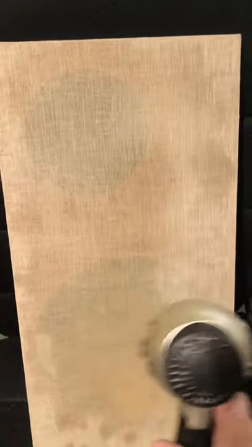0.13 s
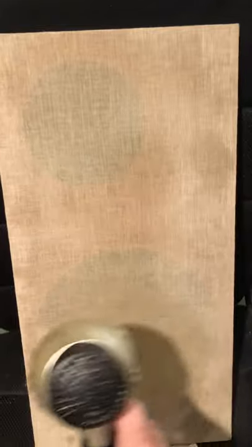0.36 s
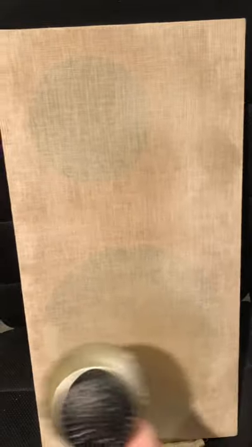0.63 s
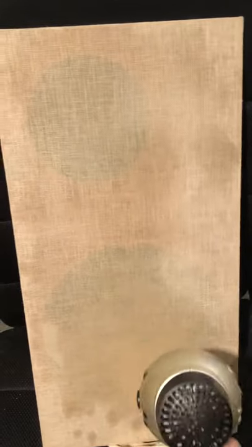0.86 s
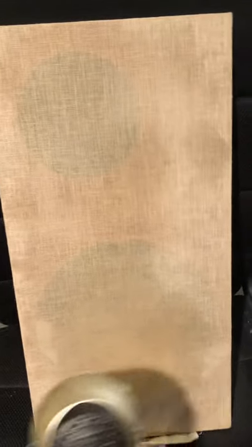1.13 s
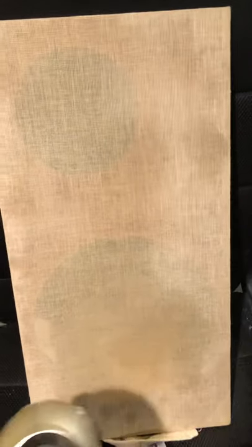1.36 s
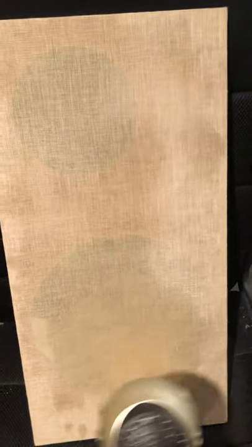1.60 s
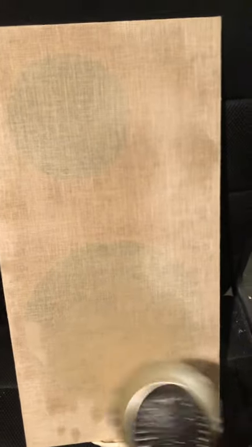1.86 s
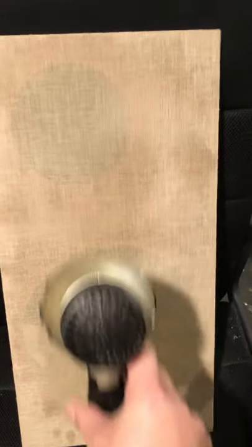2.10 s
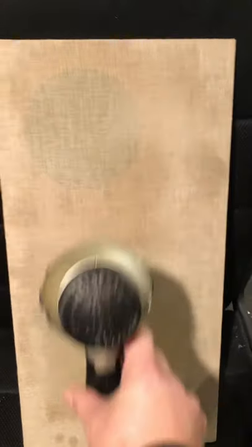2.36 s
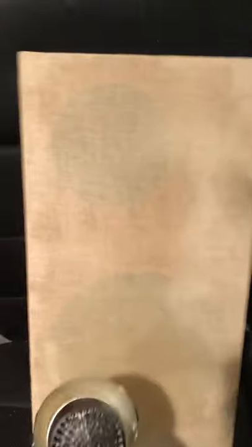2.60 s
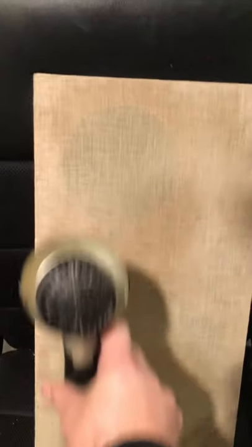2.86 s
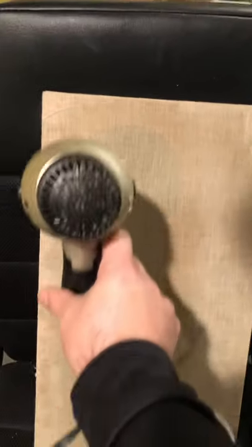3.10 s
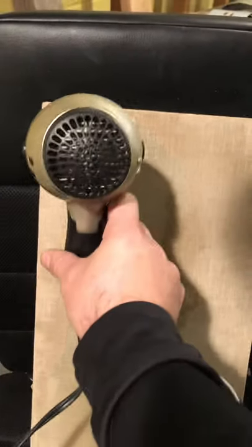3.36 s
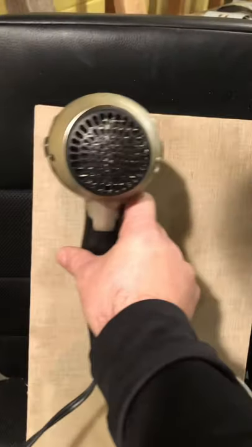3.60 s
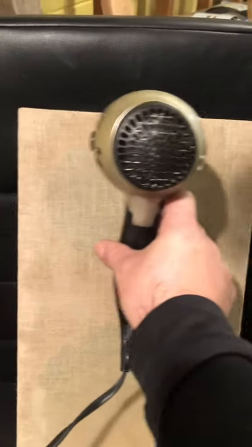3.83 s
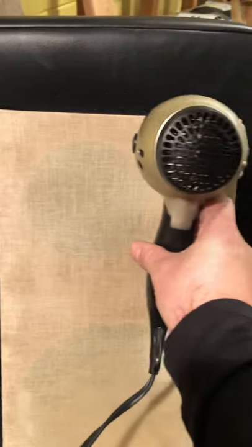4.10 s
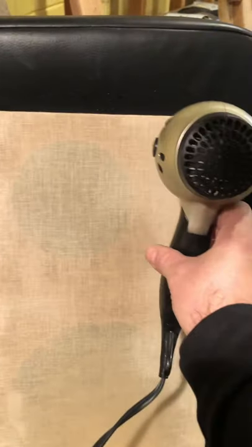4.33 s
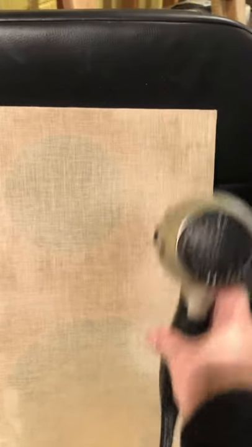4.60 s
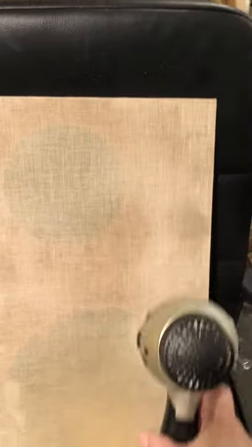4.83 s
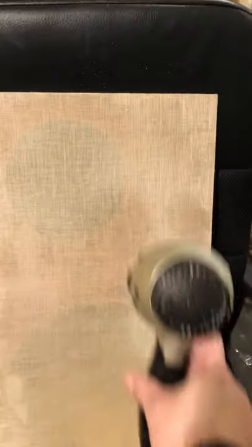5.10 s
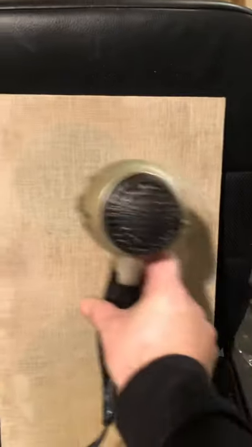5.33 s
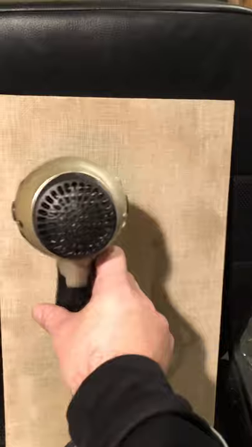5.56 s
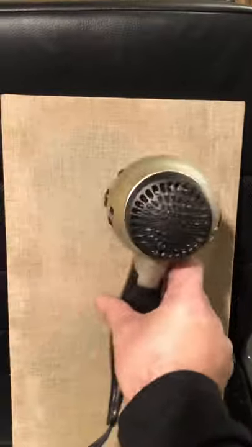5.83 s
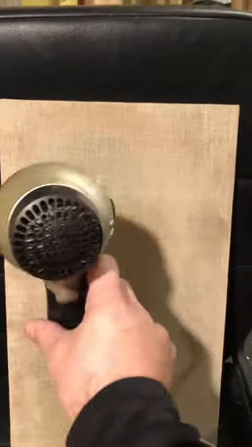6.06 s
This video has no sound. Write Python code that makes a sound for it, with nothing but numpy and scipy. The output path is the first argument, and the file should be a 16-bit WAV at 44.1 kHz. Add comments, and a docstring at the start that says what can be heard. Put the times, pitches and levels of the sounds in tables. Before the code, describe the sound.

A handheld hair dryer runs at full, steady speed for about 6.2 seconds, close to the microphone in a small indoor space with soft surfaces and a short, faint room tail. Dense, bright rushing air fills the mid and treble, with little bass and a crisp hiss that flickers slightly. The barrel adds hollow, whistling colour near 1.4 and 2.6 kHz. A thin whine near 4.1 kHz sags almost imperceptibly, with a weaker fan tone an octave below; both waver and briefly fade. From 0 to 1.9 s the dryer sweeps low over the cloth board, its colour gliding. Around 2 to 2.4 s it lifts and turns, shifting the resonance; after 2.9 s it reaches the upper board, with slightly more hiss. Quicker changes occur around 4.7 to 5.3 s, then it sweeps on, still blowing at the end.

```python
"""Hair dryer swept over a board

A handheld dryer, intake grille towards a microphone, is swept over a cloth-covered board indoors.
Filtered noise is the rushing air and rings the barrel's pipe modes; sines are a seven-blade fan's whine.
The board returns the noise about a millisecond late, so notches glide as the hand moves nearer and further."""
import sys
import numpy as np
from scipy import signal
from scipy.fft import rfft, irfft
from scipy.io import wavfile
from scipy.ndimage import uniform_filter1d, map_coordinates

SR = 44100
rng = np.random.default_rng(int(sys.argv[2]) if len(sys.argv) > 2 else 0)


def volts_from_decibels(level):
    """Turn decibel levels (scalar or array-like) into linear amplitude factors."""
    exponent = np.asarray(level, float) / 20
    return 10 ** exponent


def master(y):
    """Save y as 16-bit WAV."""
    cut = np.clip(np.atleast_2d(y).T, -1, 1)
    pcm = np.round(cut * 32767)  # scale
    wavfile.write(sys.argv[1], SR, pcm.astype(np.int16))


N = 273420
T = np.arange(N) / SR


def columns(table):
    """Every column after the time column, interpolated sample by sample."""
    seconds, *rest = np.transpose(table)
    return [np.interp(T, seconds, column) for column in rest]


def unit(x):
    """Scale to rms 1."""
    return x / np.sqrt(np.mean(x ** 2))


def coloured(spectrum):
    """Gaussian noise of rms 1 with the given spectrum, log-interpolated in frequency."""
    hz, db = np.transpose(spectrum)
    f = np.arange(N // 2 + 1) * SR / N + 1  # +1 keeps the log finite
    gain = volts_from_decibels(np.interp(np.log(f), np.log(hz), db, left=-80, right=-80))
    return unit(irfft(rfft(rng.standard_normal(N)) * gain, N))


def walk(rate_per_s):
    """Slow random curve of rms 1: noise averaged twice over 1/rate."""
    k = int(SR / rate_per_s)
    smooth = uniform_filter1d(rng.standard_normal(N), k)
    return unit(uniform_filter1d(smooth, k))


def step(at_s, takes_s):
    """Smooth move from 0 to 1."""
    return (1 + np.tanh((T - at_s) / takes_s)) / 2


def bump(at_s, half_s):
    """Bell shape with top 1."""
    return np.exp(-((T - at_s) / half_s) ** 2)


def peak_filter(x, hz, width_hz):
    """Resonant band-pass with gain 1 at its centre."""
    return signal.lfilter(*signal.iirpeak(hz, hz / width_hz, fs=SR), x)


def resonance(x, hz, width_hz, db):
    """One pipe mode, set to its level."""
    return volts_from_decibels(db) * unit(peak_filter(x, hz, width_hz))


def echo(x, lag_ms, share):
    """A copy of x that arrives after a fixed or moving lag."""
    return share * map_coordinates(x, [np.arange(N) - lag_ms * SR / 1000], order=3, mode="nearest")


# The hand's pose, a guess at three angles around the usual hold. Each row: time in seconds,
# lag of the board's echo in ms, grille facing the microphone, sideways lean, roll (angles about -1 to 1).
HAND_POSE = [(0, 1.1, -0.32, 0.27, 0.8), (.3, 1.15, -0.14, 0.55, .1), (.6, 1.18, -0.094, -0.24, -0.93),
             (.8, 1.06, -.8, 0.39, -0.14), (1.0, 1.17, -1.1, 0.61, -0.49), (1.4, 1.18, -.8, 0.51, 0.015),
             (1.7, 1.04, -0.67, 0.04, .1), (1.88, 1.11, -0.94, 0.39, .15), (1.97, 1.19, -0.085, 0.15, .8),
             (2.13, 1.38, 0.61, 0.97, 0.64), (2.36, 1.23, 0.71, 1.24, .3),
             (2.45, 1.08, -.2, -0.0048, 0.062), (2.6, 1.06, -0.28, -0.56, -0.12),
             (2.8, 1.21, 0.51, .45, -0.5), (3.0, 1.23, 0.45, -.1, 0.35), (3.2, 1.22, 1.3, -0.34, .1),
             (3.7, 1.2, .95, -0.51, -0.23), (3.9, 1.21, .55, -.35, -0.22), (4.3, 1.1, 0.84, -.35, .05),
             (4.7, 1.04, -.45, -0.45, 0.52), (4.95, .97, -0.65, -1.4, 0.91), (5.05, 1.12, -0.54, 0.35, -.3),
             (5.17, 1.17, 0.041, 0.24, -0.31), (5.3, 1.18, 0.69, -0.04, -0.31),
             (5.6, 1.21, 0.36, -0.042, -0.72), (5.85, 1.27, 1.1, 0.39, 0.73), (6.0, 1.33, 0.43, 0.93, 0.29),
             (6.2, 1.35, 1.1, 0.19, 0.27)]


def posed(rows):
    """One curve per row: usual value plus the effect of the pose and of the arm reaching the board's far half."""
    reached = step(at_s=2.9, takes_s=0.11)
    pose = np.array([np.ones(N), *columns(HAND_POSE)[1:], reached])
    return np.array(rows) @ pose


def room(x):
    """Diffuse reflections; the moving dryer slides between several paths, so the fine ripple keeps changing."""
    paths, level_db, t60_s, gap_s = 6, -11, .1, .004
    t = T[:SR // 4]
    shares = np.array([walk(1.6) for _ in range(paths)])
    shares = shares / np.sqrt(np.sum(shares ** 2, axis=0))
    out = 0
    for share in shares:
        tail = rng.standard_normal(len(t)) * np.exp(-np.log(1000) * t / t60_s) * (t > gap_s)
        out = out + share * signal.fftconvolve(x, tail / np.sqrt(np.sum(tail ** 2)))[:N]
    return volts_from_decibels(level_db) * out


def nearby_echo(noise):
    """An inverted echo while the dryer is held low."""
    return echo(noise, 2.5, -.11 * bump(at_s=1.3, half_s=.6))


def dulled(noise):
    """Cloth and upholstery absorb treble: first-order low-pass."""
    return signal.lfilter(*signal.butter(1, 4370, fs=SR), noise)


def seat_echo(soft_noise):
    """Echo off the seat under the board; its lag shortens as the dryer is lifted."""
    lifted = step(at_s=1.92, takes_s=0.36)
    lag_ms = np.interp(lifted, (0, 1), (2.45, 1.93))
    share = np.interp(lifted, (0, 1), (0.14, .11))
    return echo(soft_noise, lag_ms, share)


def board_echo(soft_noise):
    """Echo off the board, its lag following the hand; the share grows with the lag."""
    usual_lag_ms, usual_share, share_per_ms = 1.17, 0.21, 0.12
    lag_ms = columns(HAND_POSE)[0]
    return echo(soft_noise, lag_ms, usual_share + share_per_ms * (lag_ms - usual_lag_ms))


# Pitch of the 14th order: the motor sags slowly, the moving hand bends it up and down.
# Each row: time in seconds, pitch in Hz.
WHINE_HZ = [(0.0, 4103.5), (0.35, 4102.8), (0.7, 4107.8), (1.05, 4099.3), (1.35, 4104.8), (1.7, 4103.8),
            (2.4, 4097.3), (2.6, 4103.3), (2.75, 4105.5), (2.8, 4105.3), (2.95, 4099.5), (3.25, 4095.3),
            (3.5, 4097.5), (3.95, 4096.0), (4.15, 4098.3), (4.55, 4092.5), (4.75, 4094.0), (4.9, 4100.0),
            (5.0, 4101.5), (5.45, 4092.5), (5.7, 4094.5), (5.9, 4090.8), (6.05, 4097.8), (6.2, 4096.2)]
# Tones of the fan. Each entry: multiple of shaft speed.
SHAFT_ORDERS = (1, 4, 7, 14, 21, 28, 35, 49)
# Phase wander of each order. Each entry: rms in radians.
PHASE_WANDER_RAD = (.7, .9, .3, .15, .33, .33, .33, .33)
# How each order beams. Each row, one an order: usual rms level in dB, dB per unit of facing, of lean,
# of roll, dB once the arm has reached out.
FAN_BEAM_DB = [(-42.5, 0.5, .3, 1.5, -18), (-45, 2, -.3, -1, 6), (-32.8, 0, .2, 0.5, -1.5),
               (-28.5, 0.3, .2, -.2, -1), (-42.5, -6, -.3, .3, -10), (-53, .1, .1, -2, .1),
               (-44, 1.2, .4, 3, -2), (-51, .1, .1, .1, .1)]
# Moments when the 7th order grows quieter. Each row: centre in seconds, depth in dB, half-length in seconds.
ORDER_7_DIPS = [(.03, -11, 0.12), (.5, -8, 0.15), (.8, -6, .06), (1.53, -7, 0.2), (2.28, -8, .09),
                (2.76, -11, 0.082), (3.5, -9, .1), (3.8, -4, .2), (4.22, -13, .22), (4.82, -5, .12),
                (5.28, -7, .08), (5.68, -8, 0.13), (6.18, -7, .1)]
# Moments when the 14th order grows quieter. Each row: centre in seconds, depth in dB, half-length in seconds.
ORDER_14_DIPS = [(.1, -6, 0.14), (1.0, -12, .16), (1.88, -7, 0.15), (2.62, -5, .16), (3.08, -7, .09),
                 (4.28, -6, .15), (4.86, -8, .09), (5.82, -6.5, .17), (6.2, -5, 0.055)]


def fan():
    """Shaft and blade-pass tones (seven blades) on one phase, wavering in turbulent inflow, and mains hum."""
    shaft_hz = columns(WHINE_HZ)[0] / 14
    turn_rad = 2 * np.pi * np.cumsum(shaft_hz) / SR
    turn_rad = turn_rad + 0.004 * walk(10)  # the hand's tremor shifts the path, more radians for higher orders
    dips = {7: ORDER_7_DIPS, 14: ORDER_14_DIPS}
    out = volts_from_decibels(-57) * np.sin(2 * np.pi * 120 * T)  # hum
    for order, db, wander_rad in zip(SHAFT_ORDERS, posed(FAN_BEAM_DB), PHASE_WANDER_RAD):
        if order in dips:
            db = db + sum(depth_db * bump(at_s, half_s) for at_s, depth_db, half_s in dips[order])
        else:
            db = db + 1.5 * walk(8.1)  # the weaker orders come and go
        phase_rad = order * turn_rad + wander_rad * walk(47)
        out = out + volts_from_decibels(db + 1.3 * walk(27)) * np.sin(phase_rad)
    return np.sqrt(2) * out  # levels are rms


# Pipe modes: first and skirt, second and skirt, third, cross.
# Each row: centre in Hz, width in Hz, level in dB before beaming.
PIPE_MODES = [(1352, 67, 2), (1416, 330, -3.5), (2593, 42, 2.5), (2490, 560, -14), (3630, 430, 1.5),
              (8540, 220, 5.5)]
# How the modes beam: first, its skirt relative to it, second, third, cross. Each row: usual gain in dB,
# dB per unit of facing, of lean, of roll, dB once the arm has reached out.
BARREL_BEAM_DB = [(-30.5, 4, -2.4, 3, -0.67), (1.2, -2.5, 6.8, -6, 1.1), (-34.5, 0.2, 7.5, -3.5, 0.06),
                  (-28, 2, -0.8, -3.5, -0.49), (-41.5, 2.5, -1.5, 4, .2)]


def barrel():
    """Turbulence rings the barrel; the two lower modes are a sharp peak on a wide skirt."""
    eddies = rng.standard_normal(N)
    peak_1, skirt_1, peak_2, skirt_2, mode_3, cross = (resonance(eddies, *mode) for mode in PIPE_MODES)
    first, skirt, second, third, across = volts_from_decibels(posed(BARREL_BEAM_DB))
    low = first * (peak_1 + skirt * skirt_1) + second * (peak_2 + skirt_2)
    return low + third * mode_3 + across * cross


# Hollows between the barrel's modes. Each row: centre in Hz, width in Hz.
HOLLOWS_HZ = [(1860, 120), (3030, 300), (4800, 340)]
# Depth of each hollow, deeper at some angles. Each row: usual share 0-1, change per unit of facing,
# of lean, of roll, change once the arm has reached out.
HOLLOW_SHARES = [(0.17, 0.31, .12, .05, .03), (0.04, -0.27, -.05, -.03, -.03),
                 (0, -.15, 0.0057, -.05, -.05)]


def hollowed(x):
    """Take a moving share out of the air around each hollow."""
    for (hz, width_hz), share in zip(HOLLOWS_HZ, posed(HOLLOW_SHARES)):
        x = x - np.clip(share, 0, .9) * peak_filter(x, hz, width_hz)
    return x


# Spectra of the four parts of the air. Each row: frequency in Hz, relative density in dB per Hz.
RUSH_SPECTRUM = [(900, -7.5), (1100, -6), (2000, -0.5), (2700, 1), (3000, -2.5), (3400, -1), (4700, -3),
                 (6000, 0.5), (7500, -1.5), (8800, -1.5), (10000, -5.5), (11500, -15)]
HISS_SPECTRUM = [(9000, -17), (10300, 1.5), (11500, 5.5), (12600, 3), (13700, 4.5), (15000, 3.5),
                 (16500, 0)]
ROAR_SPECTRUM = [(250, -10), (400, 0.5), (550, 2), (800, 3.5), (1000, 0), (1150, -4.5), (1500, -2)]
RUMBLE_SPECTRUM = [(25, -46), (60, -27), (120, -11.5), (220, -1), (300, 1.5), (400, 0.5), (600, -13)]
# How rush, hiss, roar and rumble beam. Each row: usual level in dB, dB per unit of facing, of lean,
# of roll, dB once the arm has reached out.
AIR_BEAM_DB = [(-19.5, 0.5, .9, .3, 0.22), (-30, 0.9, .3, .3, 1.6), (-33.5, -0.06, -.4, -.6, 1.95),
               (-36.5, 0.1, 0.7, -0.67, 0.8)]


def air():
    """Turbulence at the grille and nozzle; eddies make rush and hiss flutter a little."""
    rush_db, hiss_db, roar_db, rumble_db = posed(AIR_BEAM_DB)
    gust = walk(48)
    rush = volts_from_decibels(rush_db + 0.13 * gust + 0.47 * walk(27)) * coloured(RUSH_SPECTRUM)
    hiss = volts_from_decibels(hiss_db + .3 * gust + 0.31 * walk(12)) * coloured(HISS_SPECTRUM)
    roar = volts_from_decibels(roar_db) * coloured(ROAR_SPECTRUM)
    rumble = volts_from_decibels(rumble_db) * coloured(RUMBLE_SPECTRUM)
    return rush + hiss + roar + rumble


def scene():
    """Air and barrel with their echoes and room, plus the direct fan, at one microphone."""
    noise = hollowed(air()) + barrel()
    soft_noise = dulled(noise)
    echoes = board_echo(soft_noise) + seat_echo(soft_noise) + nearby_echo(noise)
    heard = noise + echoes + room(noise) + fan()
    return np.array([heard, heard])


# Treble bands that flicker. Each entry: band edge in Hz.
FLICKER_BANDS_HZ = (4130, 5170, 6200, 7580, 8270, 9650, 11000, 12400, 13800, 15000)


def flicker(x):
    """The treble flickers: now and then a band is unrelated left and right for two steps."""
    step_samples, first_sample, chance_per_step = 1024, 274, .034
    left, right = x.copy(), x.copy()
    shape = np.sin(np.pi * np.arange(2 * step_samples) / (2 * step_samples)) ** 1.5
    f, spectrum = np.arange(N // 2 + 1) * SR / N, rfft(x)
    for lo_hz, hi_hz in zip(FLICKER_BANDS_HZ, FLICKER_BANDS_HZ[1:]):
        band = irfft(spectrum * ((f > lo_hz) & (f < hi_hz)), N)
        starts = np.zeros(N)
        slots = starts[first_sample::step_samples]  # a view into starts
        slots[:] = rng.random(len(slots)) < chance_per_step
        angle_rad = np.clip(signal.fftconvolve(starts, shape)[:N], 0, 1) * np.pi / 4
        other = np.roll(band, SR // 4)  # a quarter second away, so unrelated
        left += (np.cos(angle_rad) - 1) * band + np.sin(angle_rad) * other
        right += (np.cos(angle_rad) - 1) * band - np.sin(angle_rad) * other
    return np.array([left, right])


def low_pass(x):
    """Removes everything above the highest recorded frequency."""
    return signal.sosfilt(signal.butter(12, 16540, fs=SR, output="sos"), x)


def record(dry):
    """One microphone on both channels with a steep top cut and a flickering treble."""
    top_cut = signal.ellip(12, .2, 80, 15720, fs=SR, output="sos")
    finished = flicker(signal.sosfilt(top_cut, dry[0]))
    return low_pass(finished)


dry = scene()
out = record(dry)
master(out)
```